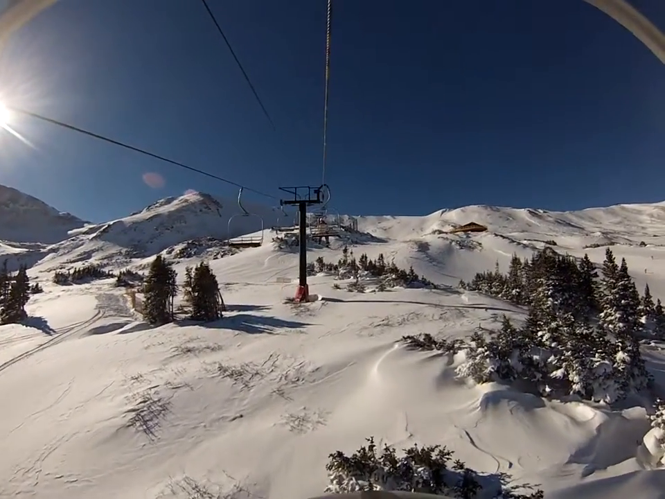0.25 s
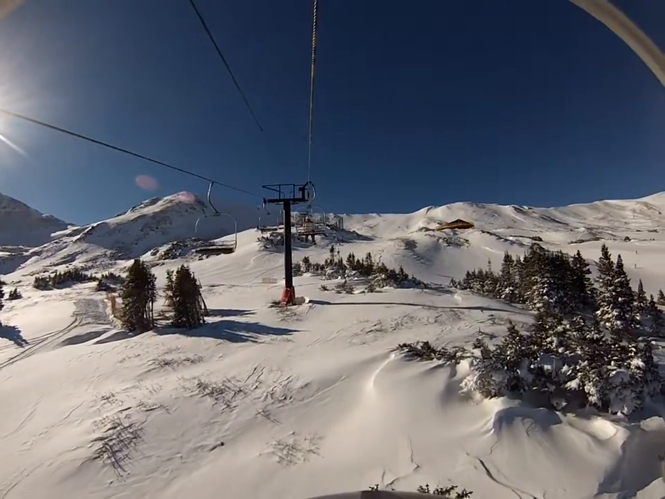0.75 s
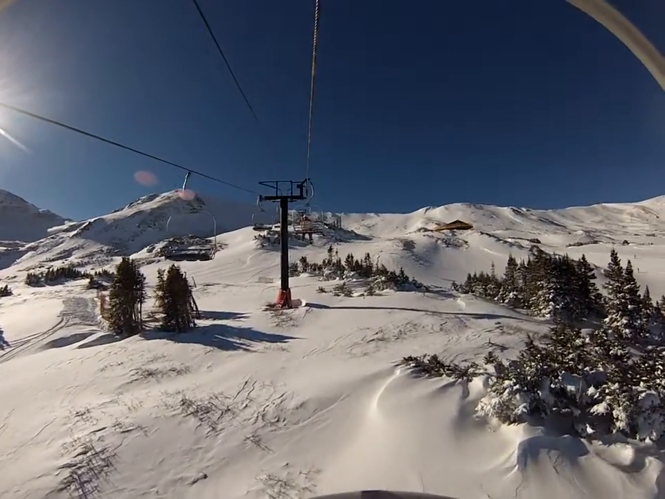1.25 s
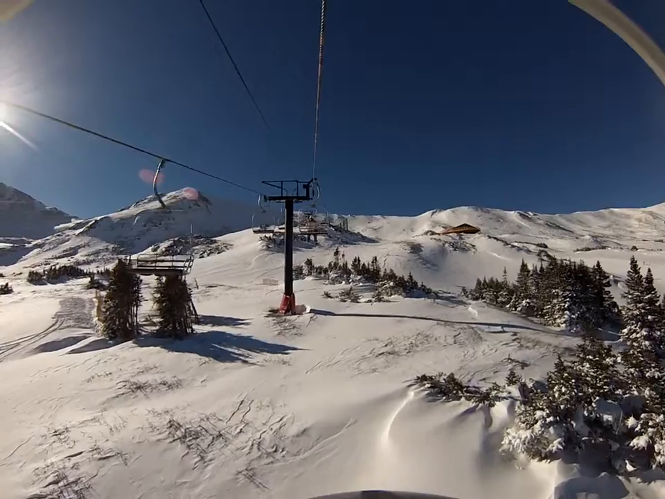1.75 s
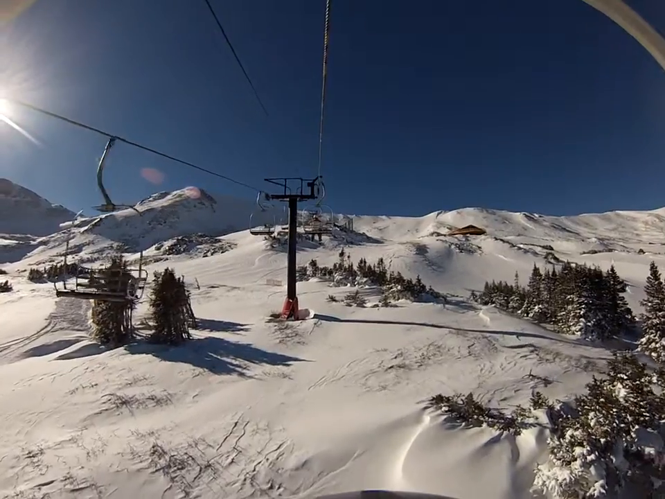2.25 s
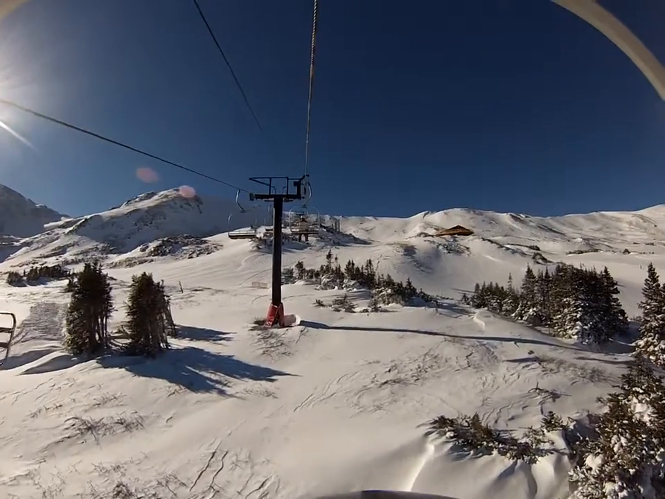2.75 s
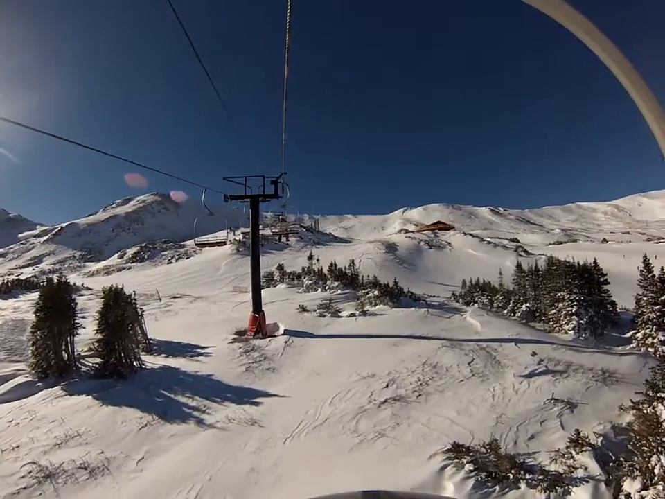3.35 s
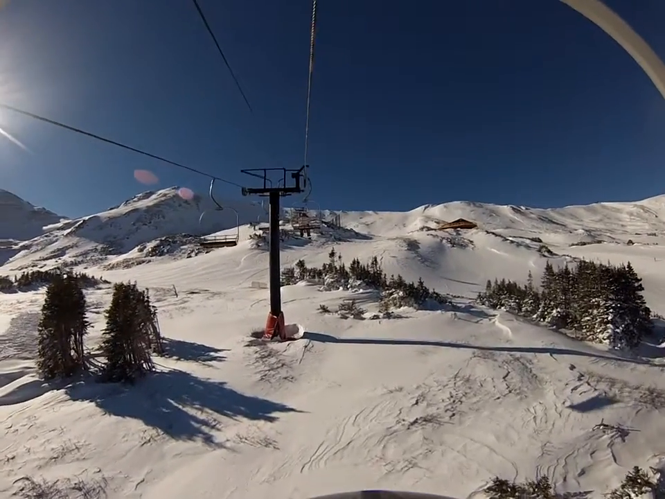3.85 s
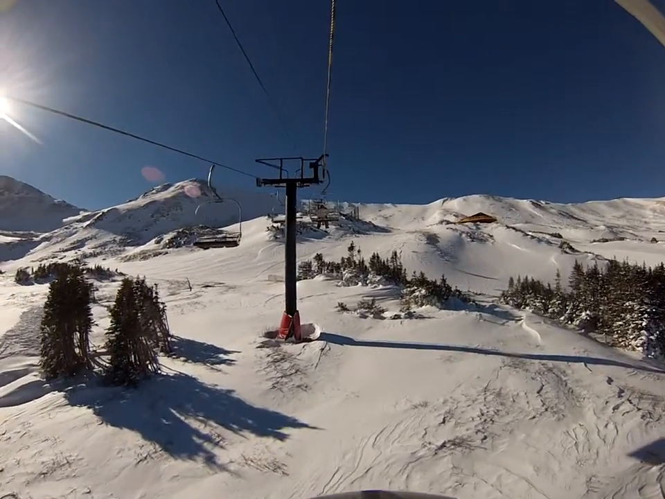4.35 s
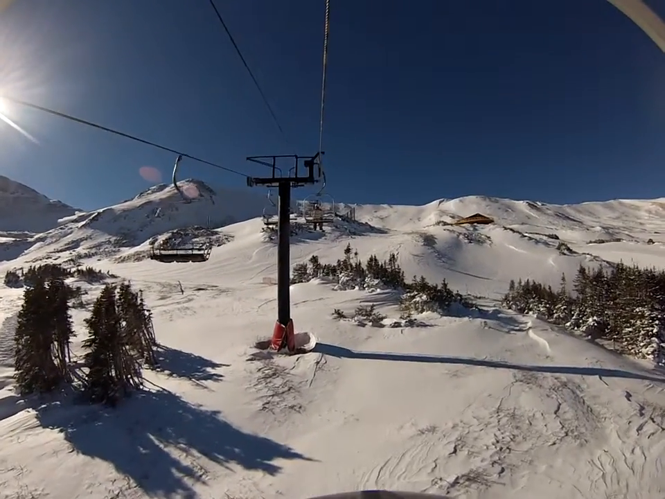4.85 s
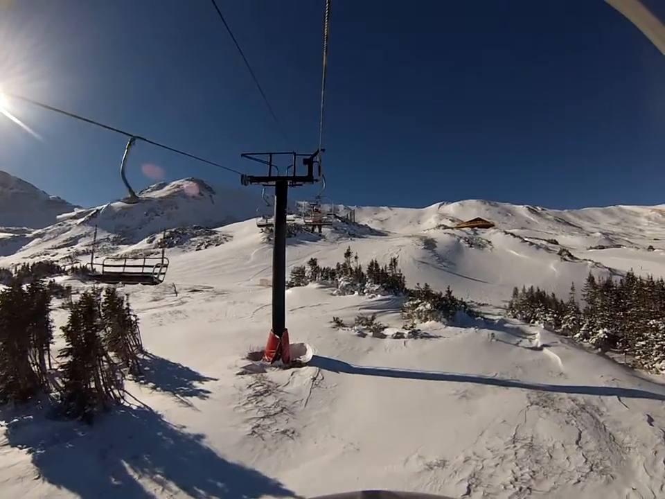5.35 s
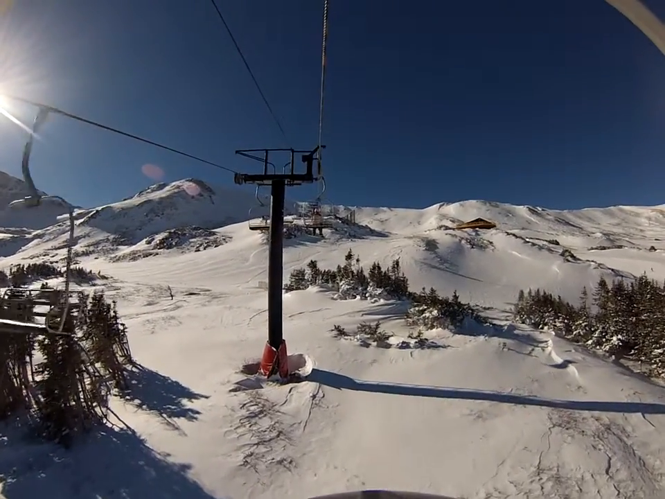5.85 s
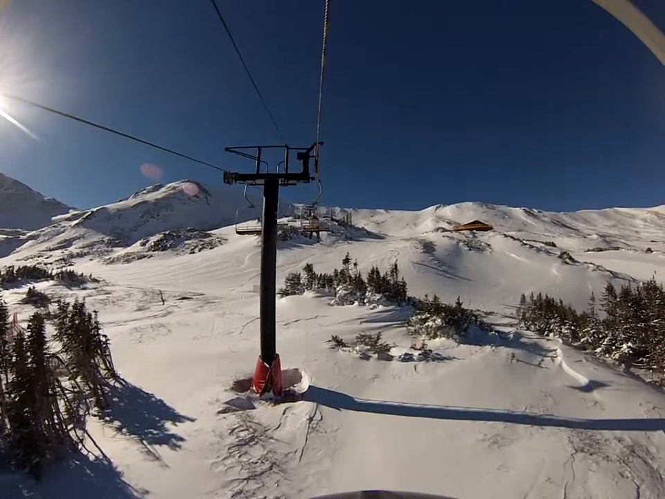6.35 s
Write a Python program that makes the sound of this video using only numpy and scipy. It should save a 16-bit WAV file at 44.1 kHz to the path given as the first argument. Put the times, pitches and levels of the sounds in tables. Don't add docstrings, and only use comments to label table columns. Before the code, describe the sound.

Deep wavering rumble of a moving chairlift, strongest lurch past four seconds, with hollow plastic creaking, faint metallic ringing, sparse clicks and steady electronic hiss.

```python
import sys
import numpy as np
from scipy import signal
from scipy.fft import rfft, irfft, next_fast_len
from scipy.io import wavfile
from scipy.ndimage import uniform_filter1d, map_coordinates

SR = 44100
rng = np.random.default_rng(int(sys.argv[2]) if len(sys.argv) > 2 else 0)


def file_out(sig):
    cols = np.atleast_2d(sig).T
    lim = np.clip(cols, -1, 1)
    pcm = np.round(lim * 32767).astype(np.int16)
    wavfile.write(sys.argv[1], SR, pcm)


def volts(x):
    e = np.asarray(x, float) / 20
    return 10 ** e


N = 291942

# (t/s, length/s, level/dB, f/Hz)
SWAY = [(0.05, 0.52, -46.5, 28.7), (0.768, 0.54, -48, 22.1), (1.217, 0.18, -49, 24.2),
        (1.711, 0.07, -44, 27.6), (1.826, 0.63, -48.8, 23), (1.938, 0.06, -45, 24),
        (2.14, 0.069, -40.5, 21.4), (2.36, 0.42, -44.5, 25.1), (2.742, 0.053, -46, 23.2),
        (2.922, 0.91, -49.5, 20.5), (3.731, 0.36, -48.5, 21.9), (4.211, 0.24, -38, 22.7),
        (4.422, 0.09, -26.6, 24.3), (4.588, 0.147, -28.8, 21.5), (4.685, 0.46, -31.5, 23.2),
        (5.062, 0.156, -33.5, 19.1), (5.333, 0.58, -35.5, 18.3), (5.634, 0.099, -40, 25.5),
        (5.832, 0.086, -35, 22.5), (6.127, 0.54, -39, 22.8), (6.433, 0.045, -36.5, 25.4),
        (6.562, 0.17, -39.5, 22.7)]
# (t/s, length/s, change/dB)
GUSTS = [(.17, .2, -2.5), (.91, 0.11, 5.5), (2.8, .2, -3.5), (3.35, .3, -1.5), (1.15, .1, 2), (1.8, .1, 4),
         (2.04, .07, 4), (2.45, 0.058, 4), (3.95, .15, 2), (4.9, 0.34, 2.5), (5.29, .12, 4),
         (6.45, .2, 2.5)]
# (t/s, length/s, level/dB, housing peak f/Hz)
RUB = [(0.385, 0.078, -74, 1312.7), (0.406, 1, -76, 1310), (0.943, 0.288, -80, 1350),
       (1.529, 0.093, -77, 1380), (1.692, 0.088, -71, 1340), (2.044, 0.049, -60.9, 1400),
       (2.229, 0.033, -67, 1350), (2.544, 0.5, -69, 1340), (2.6, 0.069, -61.5, 1280),
       (2.8, 0.15, -63, 1325), (3.033, 0.064, -66.5, 1370), (3.135, 0.062, -68, 1378),
       (3.39, 0.457, -66, 1367.0), (3.448, 0.079, -69.0, 1353.8), (3.841, 0.14, -66, 1415.9),
       (4.04, 0.143, -73, 1413.2), (4.221, 0.487, -69.5, 1346.5), (4.612, 0.092, -64.5, 1390),
       (4.722, 0.07, -69, 1363.3), (4.872, 0.058, -67, 1355.0), (4.97, 0.039, -68, 1350),
       (5.045, 0.068, -68, 1370), (5.271, 0.258, -71, 1351.5), (5.61, 0.48, -68.5, 1355.3),
       (6.025, 0.063, -64.5, 1395.7), (6.141, 0.301, -69.4, 1335.6), (6.549, 0.063, -60, 1350),
       (6.616, 0.091, -78, 1370)]
# (t/s, level/dB)
LOAD = [
    (0, -71.5),
    (1.85, -71.5),
    (2, -60),
    (2.9, -65.5),
    (3, -66.5),
    (3.2, -59.5),
    (5.8, -65),
    (6.6, -67.5),
]
# (f/Hz, width/Hz, level/dB)
HOUSING = [(883, 119, -1), (1294, 166, 4), (1377, 100, 6.5), (1560, 178, -1)]


def noise():
    return rng.standard_normal(N)


def unit(x):
    return x / np.sqrt(np.mean(x ** 2) + 1e-20)


def steady(x, seconds):
    power = np.abs(uniform_filter1d(x ** 2, size=int(seconds * SR)))
    return x / np.sqrt(power + 1e-20)


def curves(rows):
    s, *cols = np.transpose(rows)
    return [np.interp(np.arange(N) / SR, s, c) for c in cols]


def wobble(rate_hz):
    knots = rng.standard_normal(int(N * rate_hz / SR) + 4)
    return map_coordinates(knots, [np.arange(N) * rate_hz / SR])


def filtered(x, response):
    m = next_fast_len(N + SR // 2)
    return irfft(rfft(x, m) * response(np.fft.rfftfreq(m, 1 / SR)), m)[:N]


def modes(table):
    def response(f):
        total = 0
        for k, (centre_hz, width_hz, db) in enumerate(table):
            damping = 1j * f * width_hz
            total = total + (-1) ** k * volts(db) * damping / (centre_hz ** 2 - f * f + damping)
        return total
    return response


def colour(points):
    hz, db = np.transpose(points)
    return lambda f: volts(np.interp(np.log(f + 1), np.log(hz + 1), db))


def bumps(rows):
    t = np.arange(0, N / SR, 0.001)
    curve = sum(h * np.exp(-((t - s) / (0.5 * length)) ** 2) for s, length, h in rows)
    return np.interp(np.arange(N) / SR, t, curve)


def bursts(rows):
    return bumps([(s, length, volts(db)) for s, length, db in rows])


def swells(rows, rest_db):
    return 20 * np.log10(volts(rest_db) + bursts([row[:3] for row in rows]))


def pitch(rows):
    return curves([(row[0], row[-1]) for row in rows])[0]


def tone(hz, db, unsteady_hz):
    phase = 2 * np.pi * np.cumsum(hz + unsteady_hz * wobble(12)) / SR
    return np.sqrt(2) * volts(db) * np.cos(phase)


def rubbing():
    return swells(RUB, curves(LOAD)[0])


def follows(slope_db_per_db, usual_db):
    return usual_db + slope_db_per_db * (rubbing() + 62)


def sway_level():
    return swells(SWAY, rest_db=-53)


def hanger_sway():
    return tone(pitch(SWAY), sway_level() + 1.08 * wobble(10), unsteady_hz=3.26)


def rope_hum():
    # (t/s, length/s, level/dB)
    hum_swells = [(0.069, 0.31, -40.5), (0.207, 0.12, -97.9), (0.458, 0.29, -43), (0.886, 0.26, -37.5),
                  (1.406, 0.28, -43.6), (1.582, 0.11, -41), (1.766, 0.383, -42), (2.039, 0.091, -41.5),
                  (2.225, 0.32, -43.5), (2.442, 0.16, -45), (2.736, 0.275, -42.5), (2.986, 0.087, -48),
                  (3.393, 0.21, -50), (4.2, 0.614, -50.5), (4.272, 0.12, -38), (4.828, 0.49, -46),
                  (4.917, 0.112, -38.5), (5.58, 0.49, -39.5), (5.748, 0.12, -34.5), (6.035, 0.206, -39.5),
                  (6.404, 0.368, -38.5), (6.555, 0.13, -35)]
    start_hz, rise_hz_per_s = 48.27, 0.45
    hz = start_hz + rise_hz_per_s * np.arange(N) / SR
    return tone(hz, swells(hum_swells, rest_db=-54) + 0.95 * wobble(12), unsteady_hz=1.8)


def hanger_rattle():
    # (t/s, length/s, level/dB)
    shudders = [(0.128, 0.053, -49.9), (0.201, 0.91, -52.5), (0.819, 0.091, -48), (0.964, 0.059, -46),
                (1.078, 0.3, -55.5), (1.342, 0.082, -49), (1.668, 0.045, -47), (1.811, 0.684, -53),
                (2.028, 0.19, -45.5), (2.278, 0.078, -48), (2.545, 0.369, -44.3), (2.821, 0.069, -50),
                (2.996, 0.141, -45.5), (3.316, 0.36, -47.7), (3.849, 0.055, -50), (4.012, 0.74, -53),
                (4.201, 0.081, -46), (4.744, 0.055, -46.7), (4.754, 0.8, -50), (4.894, 0.053, -50.3),
                (5.164, 0.058, -49.2), (5.319, 0.11, -41.5), (5.571, 0.515, -44), (5.831, 0.15, -45.3),
                (6.448, 0.388, -47.5), (6.584, 0.06, -47)]
    # (f/Hz, width/Hz, level/dB)
    hanger_modes = [(67.2, 8, -0.5), (85.6, 11.9, 0.5), (100.5, 15.3, -3), (110.8, 9.4, -8)]
    steep = lambda f: modes(hanger_modes)(f) * modes([(88, 70, 0)])(f)
    level_db = swells(shudders, rest_db=-52.5) + 2.1 * wobble(14)
    return volts(level_db) * steady(filtered(noise(), steep), seconds=0.095)


def buffeting():
    # (f/Hz, level/dB per Hz)
    rumble_colour = [(4, -30), (10, 14.5), (33, 14), (42, 11), (62, 7.5), (120, 3.5), (180, -2), (280, -1),
                     (380, -13.5), (450, -14), (700, -45)]
    rumble_db = follows(0.51, usual_db=-60) + 0.66 * bumps(GUSTS) + 1.67 * wobble(6) + 11.5
    rumble = volts(rumble_db) * unit(filtered(noise(), colour(rumble_colour)))
    swaying_db = uniform_filter1d(sway_level(), size=SR // 3)
    skirt = unit(filtered(noise(), lambda f: modes([(34, 16, 0)])(f) ** 2))
    return rumble + volts(swaying_db - 9.5) * skirt


def seat_frame():
    # (t/s, length/s, level/dB)
    jolts = [(0.022, 0.12, -63), (0.344, 0.67, -75), (0.57, 0.044, -66), (1.046, 0.41, -62),
             (1.685, 0.082, -56), (1.716, 0.639, -69), (2.011, 0.18, -55.5), (2.263, 0.089, -48),
             (2.428, 0.066, -45), (2.519, 0.095, -53.5), (2.623, 0.072, -48.5), (2.803, 0.263, -52.5),
             (3.019, 0.074, -56), (3.26, 0.055, -51.5), (3.415, 0.246, -52.5), (3.473, 0.046, -54),
             (3.797, 0.066, -49.1), (3.924, 0.233, -55.5), (4.191, 0.046, -69), (4.288, 0.04, -59),
             (4.786, 0.8, -60), (4.844, 0.052, -48.5), (5.386, 0.067, -49.5), (5.392, 0.32, -61.8),
             (5.683, 0.094, -53), (5.814, 0.04, -59), (6.061, 0.52, -66), (6.58, 0.12, -61)]
    # (f/Hz, width/Hz, level/dB)
    frame_modes = [(217, 16, -8.5), (254.8, 19, -2.5), (282.3, 19.7, 3), (305.2, 15.5, -5),
                   (324.6, 12.5, -9.5)]
    ring = filtered(noise(), lambda f: modes(frame_modes)(f) * modes([(280, 160, 0)])(f))
    level_db = swells(jolts, curves(LOAD)[0] + 2.2) + 1.8 * wobble(20) - 1.24
    return volts(level_db) * steady(ring, seconds=0.074)


def friction(density_hz, spread_db):
    hit = rng.random(N) < density_hz / SR
    slips = hit * volts(spread_db * rng.exponential(size=N)) * noise()
    return unit(1.8 * noise() + unit(slips)) * volts(0.78 * wobble(60))


def mount():
    # (f/Hz, width/Hz, level/dB)
    shell_modes = [(1910, 316, 0), (2310, 710, -3), (2950, 560, -5.5), (4800, 1650, -18)]
    # (f/Hz, width/Hz, level/dB)
    body_modes = [(435, 81, 0), (594, 190, -2), (873, 270, -4.5)]
    # (t/s, length/s, change/dB)
    grit = [(.67, .1, 4.5), (1.53, 0.11, -3), (2.22, .08, 1.5), (2.78, .12, -1.5), (5.05, .06, 2.5),
            (5.9, .1, -5), (2.015, 0.082, 4.5), (3.25, .1, 3.5), (3.58, .12, 3), (4.3, .2, 3.5),
            (4.66, .14, 2), (5.3, .12, 2.5), (5.51, 0.089, 3), (6, 0.092, 2)]
    core_db = rubbing() + 0.69 * wobble(25)
    upper_db = follows(0.84, usual_db=-68.5) + bumps(grit) + 1.1 * wobble(15)
    lower_db = follows(0.55, usual_db=-70.5) + bumps(GUSTS) + 1.5 * wobble(8.7)
    slip = friction(density_hz=3000, spread_db=2.5)

    def ring(group, band):
        return filtered(slip, lambda f: modes(group)(f) * modes([band])(f))

    tight = np.clip((pitch(RUB) - 1280) / 110, 0, 1)
    slack_ring, tight_ring = ring(HOUSING, (1240, 220, 0)), ring(HOUSING, (1420, 600, 0))
    shifting = (1 - tight) * slack_ring + tight * tight_ring
    upper_db -= 2.5 * np.clip(1 - 2 * tight, 0, 1)
    core = volts(core_db) * steady(shifting, seconds=0.079)
    upper = volts(upper_db) * steady(ring(shell_modes, (2600, 3500, 0)), seconds=0.12)
    lower = volts(lower_db) * steady(ring(body_modes, (600, 700, 0)), seconds=0.1)
    return core + upper + lower


def preamp_hiss():
    # (f/Hz, level/dB per Hz)
    hiss_colour = [(1500, -25), (2500, -2), (4500, -2), (7000, -3.5), (10500, -6), (13000, -6.5),
                   (15400, -13)]
    return volts(-72.5 + 0.62) * unit(filtered(noise(), colour(hiss_colour)))


def clock_whine():
    # (f/Hz, level/dB)
    clock_tones = [(3000, -102), (6000, -101), (7882, -103), (7912, -99), (9000, -104), (10970, -106),
                   (10999, -104), (12000, -107), (13000, -107), (13997, -107)]
    t = np.arange(N) / SR
    return sum(np.sqrt(2) * volts(db) * np.sin(2 * np.pi * hz * t) for hz, db in clock_tones)


def sputter():
    first_s, period_s, pair_s = 0.193, 1.002, 0.027
    length_s, level_db = 0.015, -71.5
    events = [(first_s + k * period_s + late_s, length_s, level_db)
              for k in range(7) for late_s in (0, pair_s)]
    events[-1] = (6.27, 0.017, -70)
    crackle = noise() * volts(2.5 * wobble(150))
    return bursts(events) * unit(filtered(crackle, modes([(13400, 9000, 0)])))


def clicks():
    # (t/s, peak level/dB, sharpness/dB)
    ticks = [(.498, -60, -12), (1.499, -56, -20), (1.508, -54, -20), (1.5475, -51, 2), (1.9965, -46, -1),
             (2.021, -49, -10), (2.034, -50, -8), (2.046, -48, -8), (2.477, -50, -8), (3.446, -48, -10),
             (4.06, -50, -8)]
    # (f/Hz, width/Hz, level/dB)
    latch_modes = [(1020, 90, 0), (1690, 110, 1), (2350, 110, -1), (3430, 130, -9), (5100, 170, -12),
                   (6800, 180, -13)]
    out = np.zeros(N + SR)
    t = np.arange(SR // 20) / SR

    def ring(table):
        return sum(volts(db) * np.exp(-np.pi * width_hz * t) * np.sin(2 * np.pi * hz * t)
                   for hz, width_hz, db in table)

    rise = 1 - np.exp(-t / 0.0007)
    for s, db, sharp_db in ticks:
        tick = rise * (ring(HOUSING) + volts(sharp_db + 4) * ring(latch_modes))
        out[round(s * SR):][:len(t)] += volts(db - 6) * tick
    return out[:N]


def scuffs():
    # (t/s, length/s, level/dB, f/Hz)
    strokes = [(2.031, 0.042, -77, 4895), (2.207, 0.043, -76, 4800), (2.34, 0.038, -79, 4800),
               (2.58, 0.058, -74, 4976), (2.79, .04, -67.5, 5044), (3.247, 0.043, -72, 4624),
               (3.635, .04, -73, 4654), (3.849, 0.06, -72, 4800), (4.056, 0.05, -67, 4600),
               (4.06, 0.06, -67, 3530), (4.244, .04, -74, 4800), (5.294, 0.035, -76, 4800)]
    out = np.zeros(N)
    for s, length, db, hz in strokes:
        narrow = lambda f: modes([(hz, 700, 0)])(f) ** 2
        out += bursts([(s, length, db)]) * unit(filtered(noise(), narrow))
    return out


def scene():
    hanger = hanger_sway() + rope_hum() + hanger_rattle() + buffeting()
    circuits = preamp_hiss() + clock_whine() + sputter()
    return (hanger + seat_frame() + mount() + circuits + clicks() + scuffs())[None]


def top_cut(x):
    return signal.sosfilt(signal.butter(12, 15520, fs=SR, output="sos"), x)


def record(dry):
    return top_cut(dry)


dry = scene()
out = record(dry)
file_out(out)
```